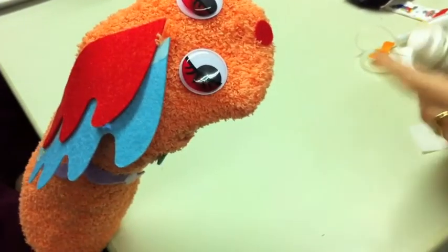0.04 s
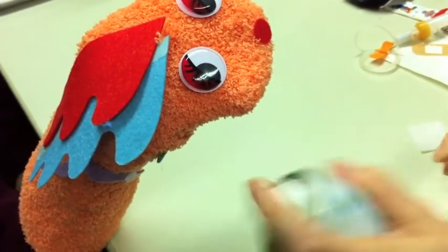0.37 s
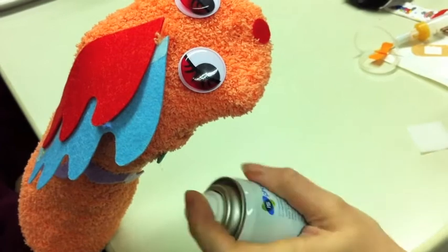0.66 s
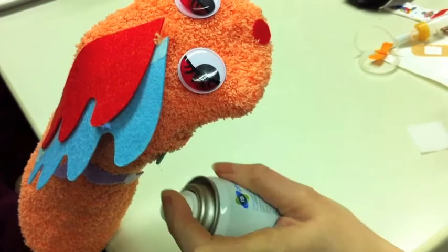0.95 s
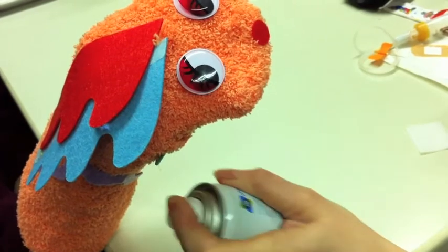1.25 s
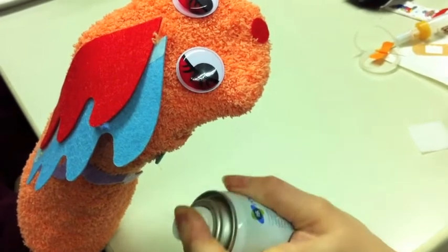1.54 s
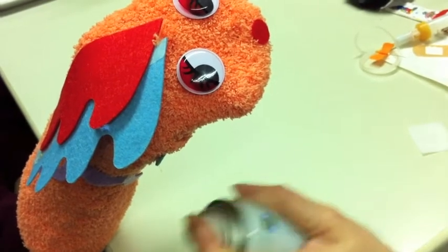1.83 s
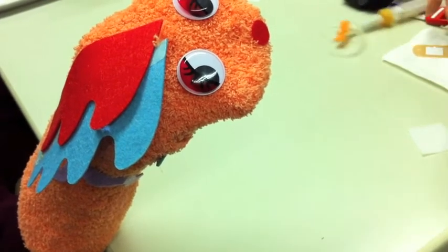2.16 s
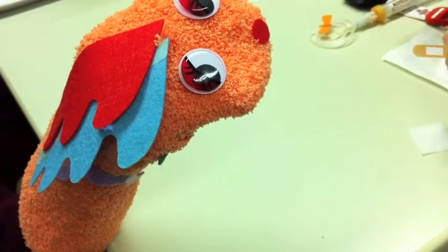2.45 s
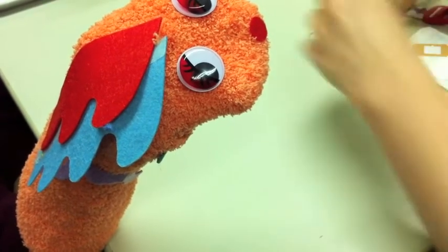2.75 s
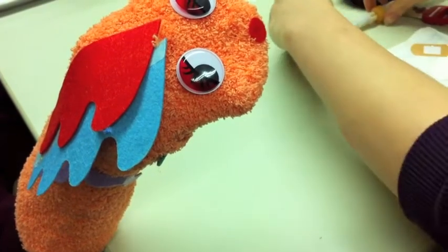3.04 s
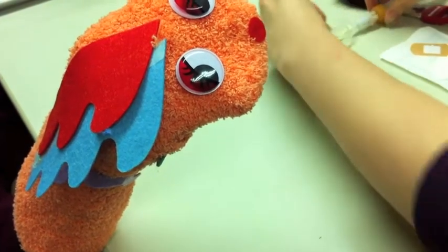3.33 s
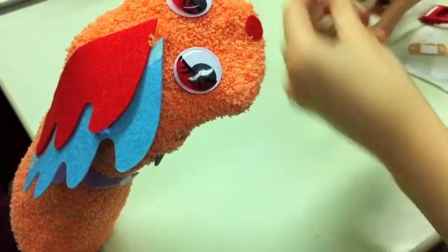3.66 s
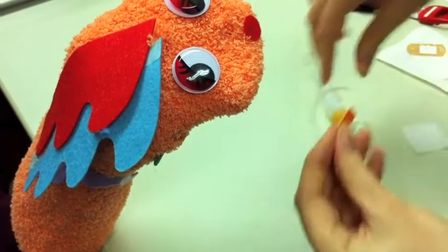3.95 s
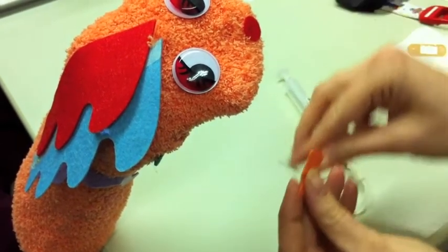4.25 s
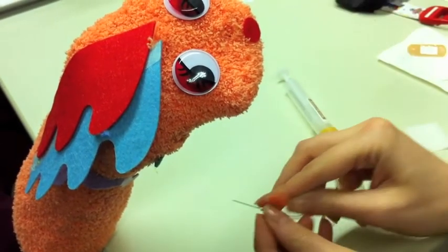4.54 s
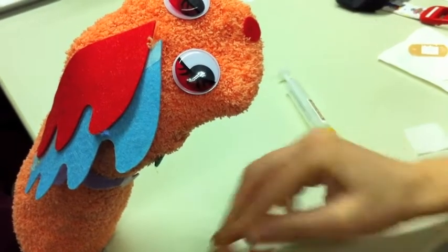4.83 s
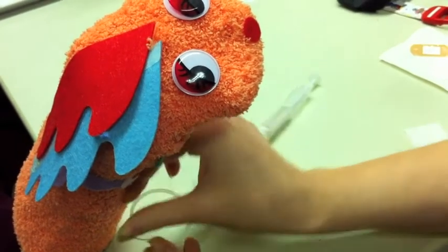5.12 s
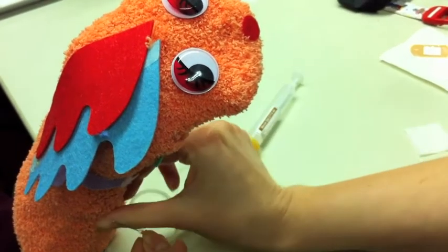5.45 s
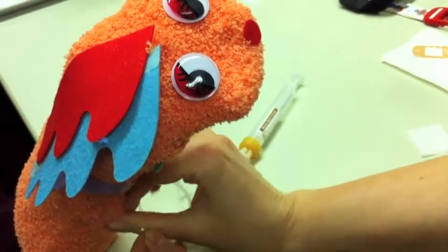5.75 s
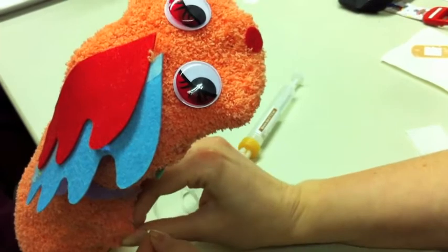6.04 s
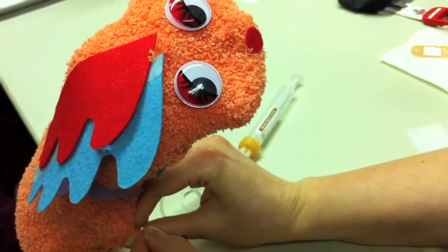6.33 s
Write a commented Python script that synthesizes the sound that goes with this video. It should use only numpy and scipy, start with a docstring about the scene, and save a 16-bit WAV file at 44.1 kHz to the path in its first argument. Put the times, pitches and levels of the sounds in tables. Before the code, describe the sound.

An aerosol can hisses and is set down with a rattling knock, then a plastic syringe drops with two sharp clicks over ventilation hum.

```python
"""Ventilation hums throughout in a small room. At a table, hands rub and tick on plastic as an aerosol
can is picked up. Its nozzle hisses from 1.2 s for a second; the can rattles, lands with a knock and
rocks on its rim. At 3.7 s a plastic syringe is tugged from its clip, chatters and drops on the table
with two sharp clicks. From about 5 s hands brush over the table and a cloth puppet."""
import sys
import numpy as np
from scipy import signal
from scipy.fft import rfft, irfft, next_fast_len
from scipy.io import wavfile
from scipy.ndimage import uniform_filter1d, minimum_filter1d

SR = 44100
rng = np.random.default_rng(int(sys.argv[2]) if len(sys.argv) > 2 else 0)


def wav_out(sig):
    """Save sig, one row per channel (or a flat mono array), as 16-bit PCM at SR to the path in sys.argv[1]."""
    wavfile.write(sys.argv[1], SR, np.round(np.clip(np.atleast_2d(sig).T, -1, 1) * 32767).astype(np.int16))


N = 286024
TIME = np.arange(N) / SR
VALVE_OPEN_S, VALVE_SHUT_S = 1.199, 2.16
CHATTER_S = 0.003   # gap between the two touches of a light contact


def from_db(db):
    """Decibels to gain."""
    return 10 ** (np.asarray(db) / 20)


def rms_one(x):
    """Scale to unit rms."""
    return x / np.sqrt(np.mean(x ** 2) + 1e-20)


def unit_energy(x):
    """Scale to unit energy."""
    return x / np.sqrt(np.sum(x ** 2) + 1e-20)


def at_hz(points, hz):
    """Read a table on a log-frequency axis."""
    f, value = np.transpose(points)
    return np.interp(np.log(np.maximum(hz, 1)), np.log(f), value)


def noise(spectrum, size=N):
    """Coloured noise, rms 1."""
    padded = next_fast_len(size, real=True)
    gain = from_db(at_hz(spectrum, np.arange(padded // 2 + 1) * SR / padded))
    white = rfft(rng.standard_normal(size), padded)
    return rms_one(irfft(white * gain, padded)[:size])


def drift(rate_hz):
    """Random wander, spread about 1."""
    return np.interp(TIME * rate_hz, np.arange(20000), rng.standard_normal(20000))


def fade(t60_s):
    """One second of exponential decay."""
    return from_db(-60 * TIME[:SR] / t60_s)


def ring(hz, t60_s):
    """One struck mode, height 1."""
    return np.sin(2 * np.pi * hz * TIME[:SR]) * fade(t60_s)


def band(x, low_hz, high_hz):
    """Causal band-pass."""
    return signal.sosfilt(signal.butter(2, [low_hz, high_hz], "band", fs=SR, output="sos"), x + 1e-18)


def soften(x, hz):
    """Low-pass: a soft contact loses treble."""
    return signal.lfilter(*signal.butter(1, hz, fs=SR), x)


def radiate(x, low_hz):
    """High-pass: small parts give off little bass."""
    return signal.sosfilt(signal.butter(3, low_hz, "high", fs=SR, output="sos"), x + 1e-18)


def add(out, start_s, sound):
    """Mix a sound in at its time."""
    i = round(start_s * SR)
    out[i:i + len(sound)] += sound[:N - i]


def click(modes, body_db, crack_db, crack_hz, crack_t60_s=0.0073, edge_ratio=1.4, snap_db=-1):
    """One contact: a snap, a splintery crack and the damped ring of the part hit."""
    splinters = unit_energy(rng.standard_normal(SR) * fade(crack_t60_s))
    snap = from_db(snap_db) * (np.arange(SR) == 0)
    crack = unit_energy(band(splinters + snap, crack_hz / edge_ratio, crack_hz * edge_ratio))
    body = sum(from_db(body_db + db) * ring(hz, t60) for hz, db, t60 in modes)
    return body + 2 * from_db(crack_db) * crack


def thin_rings(taps, modes, gain_db):
    """A light hollow body rings on after each tap."""
    out = np.zeros(N)
    for s, tap_db in taps:
        for hz, mode_db, t60 in modes:
            add(out, s, from_db(gain_db + tap_db + mode_db + rng.normal(0, 0.87)) * ring(hz, t60))
    return radiate(out, low_hz=503)


def room(x, build_s=0.00057):
    """Dense reflections: fast build-up, longest decay in the bass."""
    # reflection spectrum: f/Hz, level/dB
    colour = [(60, -41), (200, -1.5), (800, 6.5), (1800, 4.5), (2800, 2.5), (4000, 5), (7000, 1),
              (11000, 4), (16000, 8)]
    # reverberation time: f/Hz, t60/s
    decay = [(150, 0.73), (700, 0.19), (2000, 0.35), (4000, 0.29), (8000, 0.27), (15000, 0.15)]
    edges_hz = np.geomspace(60, 19000, 10)
    tail = np.zeros(SR)
    for low, high in zip(edges_hz, edges_hz[1:]):
        tail += band(noise(colour, SR), low, high) * fade(at_hz(decay, np.sqrt(low * high)))
    onset = 1 - np.exp(-TIME[:SR] / build_s)
    return signal.fftconvolve(x, unit_energy(tail * onset))[:N]


def in_room(x, room_db, low_hz):
    """A small source plus its reflections."""
    return radiate(x + from_db(room_db) * room(x), low_hz)


def moving_room(x, turns_per_s=0.42):
    """The reflection pattern shifts as the source moves."""
    angle = 2 * np.pi * turns_per_s * (TIME - VALVE_OPEN_S)
    return np.cos(angle) * room(x) + np.sin(angle) * room(x)


def ventilation(air_db=-50.5, hum_db=-68, hum_band_hz=(178, 198)):
    """Steady air noise with one soft duct resonance."""
    # air spectrum: f/Hz, level/dB
    air = [(20, 4), (45, -14), (70, -9.5), (120, -3), (170, 0.5), (250, 0), (450, -3), (850, -2),
           (2200, -3), (2700, -6.5), (3300, -13.5), (4500, -16.5), (6500, -19), (15500, -21.5)]
    hum = rms_one(band(rng.standard_normal(N), *hum_band_hz))
    return from_db(air_db) * noise(air) + from_db(hum_db) * hum


def rubbing(strokes, spectrum, catch_db):
    """Friction swells and fades with each stroke and catches unevenly."""
    speed = sum(from_db(db) * np.exp(-2 * ((TIME - s) / length) ** 2) for s, length, db in strokes)
    return speed * from_db(catch_db * drift(130)) * noise(spectrum)


def finger_rubs():
    """Skin rubs; fingers slide on the table top."""
    # friction spectra: f/Hz, level/dB
    skin = [(2000, -22), (3000, 5), (4000, -14), (5500, -4), (7500, -5), (9300, 5), (11500, -2.5),
            (14000, 1.5), (16000, -10)]
    table = [(100, -30), (600, -17), (1200, 2), (1800, 7), (2350, 6), (2900, 0), (3600, -6), (4400, -4),
             (6000, -17), (14000, -27)]
    # strokes: centre t/s, length/s, level/dB
    skin_strokes = [(.19, 0.16, -54), (.3, 0.056, -49.5), (.395, 0.053, -53.5), (.76, 0.14, -61),
                    (2.95, 0.24, -63), (3.42, 0.13, -65), (4.89, .05, -54.5)]
    table_strokes = [(5.3, 0.12, -57), (5.52, 0.38, -53.5)]
    return rubbing(skin_strokes, skin, catch_db=2.5) + rubbing(table_strokes, table, catch_db=1.5)


def fabric_rubs():
    """Cloth and sleeve rustle in strokes."""
    # friction spectra: f/Hz, level/dB
    cloth = [(120, -28), (280, 13.5), (400, 5.5), (560, 7), (1000, 7), (1600, 0.5), (2400, 1), (3300, -4),
             (4500, -15), (7000, -17), (15000, -17)]
    sleeve = [(100, -38), (1200, -3), (2200, 1), (2900, 5.5), (3500, 1), (4200, -8), (5200, -9),
              (8000, -16), (15000, -29)]
    # strokes: centre t/s, length/s, level/dB
    cloth_strokes = [(.3, 0.033, -53.5), (2.95, 0.07, -51), (5.22, 0.081, -49), (5.5, 0.9, -58.5),
                     (5.96, 0.026, -53)]
    sleeve_strokes = [(.18, 0.038, -54), (3.06, 0.12, -57.5), (3.885, 0.061, -35.5), (5.075, 0.085, -48.5)]
    return rubbing(cloth_strokes, cloth, catch_db=3) + rubbing(sleeve_strokes, sleeve, catch_db=5)


def table_bumps():
    """Heavier contacts shake the whole table."""
    # contacts: t/s, level/dB, t60/s
    bumps = [(2.163, -40.5, 0.58), (2.29, -25, 0.26), (3.927, -30, 0.19), (4.02, -50, .15)]
    # table rumble: f/Hz, level/dB
    colour = [(20, 10), (50, -14), (100, -14.5), (200, -2), (350, -2.5), (700, -18), (2000, -50)]
    out = np.zeros(N)
    for s, db, t60 in bumps:
        add(out, s, from_db(db) * noise(colour, SR) * fade(t60))
    return out


def finger_ticks(second_db=-3):
    """Faint double ticks of fingers on plastic."""
    # touches: t/s, body/dB, crack/dB, crack f/Hz
    ticks = [(.296, -46, -40, 8000), (0.6654, -29, -22.5, 4660), (.847, -44, -34, 13000),
             (1.003, -48, -37.5, 12500), (3.464, -42, -29.5, 9350)]
    # button modes: f/Hz, level/dB, t60/s
    button = [(2940, 5.5, 0.0035), (4570, -8.5, .012), (5350, -4, 0.015)]
    out = np.zeros(N)
    for s, body_db, crack_db, crack_hz in ticks:
        add(out, s, click(button, body_db, crack_db, crack_hz))
        add(out, s + CHATTER_S, from_db(second_db) * click(button, body_db, crack_db, crack_hz))
    return in_room(out, room_db=-8, low_hz=1500)


def syringe_tugs(gain_db=-31, rasp_db=-1):
    """Syringe and clip are tugged free: dying dry scrapes excite the plastic clip."""
    # tugs: t/s, level/dB, low-pass f/Hz, t60/s
    tugs = [(3.7105, -7, 4000, 0.085), (3.7873, 0, 15000, 0.14), (3.801, 0.5, 14000, 0.11),
            (3.8435, -17, 7000, 0.035)]
    # clip resonances: f/Hz, width/Hz, level/dB
    clip_modes = [(800, 430, -7.5), (1700, 300, -27), (2880, 310, -4), (3980, 400, -3), (4500, 230, -15),
                  (6240, 300, -14), (8500, 440, -10), (11450, 400, 0), (12900, 660, -1), (13650, 500, -5),
                  (15300, 900, -13)]
    out = np.zeros(N)
    for s, db, bright_hz, t60 in tugs:
        scrape = rng.standard_normal(SR) * fade(t60)
        clip = sum(from_db(level) * unit_energy(band(scrape, hz - width / 2, hz + width / 2))
                   for hz, width, level in clip_modes)
        sound = unit_energy(clip) * np.linalg.norm(scrape) + from_db(rasp_db) * scrape
        add(out, s, from_db(db + gain_db) * soften(sound, bright_hz))
    return in_room(out, room_db=-5, low_hz=298)


def syringe_click(body_db, crack_db, **crack):
    """One damped knock of the plastic syringe."""
    # syringe modes: f/Hz, level/dB, t60/s
    modes = [(1996, -0.5, 0.005), (2800, 1.5, 0.0039), (4200, -11, 0.0022)]
    return click(modes, body_db, crack_db, **crack)


def syringe_lift(second_db=-1):
    """The syringe chatters against its clip; its barrel rings on."""
    taps = [(3.7103, -20), (3.8438, -15.5), (3.874, -27), (3.897, -25)]
    # barrel modes: f/Hz, level/dB, t60/s
    barrel_modes = [(1690, -12, .1), (2830, 1, 0.11), (3680, -2, 0.13), (5350, 4.5, 0.093),
                    (6500, -10, 0.22), (8100, 4, 0.12)]
    out = np.zeros(N)
    for s, db in taps:
        for touch_s, level in ((s, db), (s + CHATTER_S, db + second_db)):
            add(out, touch_s, syringe_click(level - 2, level + 1, crack_hz=5840, edge_ratio=1.6))
    barrel = thin_rings(taps, barrel_modes, gain_db=-24)
    return in_room(out, room_db=-4, low_hz=890) + barrel


def syringe_drop(rebound_s=0.021):
    """Each end hits with a sharp click and a clack of the table top, then rebounds once."""
    # impacts: t/s, body/dB, crack/dB, crack f/Hz, clack/dB
    drops = [(3.9277, 3.5, -3.5, 7400, -6), (4.0166, 0.5, 1.5, 7100, -18.5)]
    # table clack modes: f/Hz, level/dB, t60/s
    clack_modes = [(560, -18, 0.0095), (987, -1, 0.015), (1430, -21, 0.014)]
    plastic, table = np.zeros(N), np.zeros(N)
    for s, body_db, crack_db, crack_hz, clack_db in drops:
        hit = syringe_click(body_db, crack_db, crack_hz=crack_hz,
                            crack_t60_s=0.017, edge_ratio=1.78, snap_db=-10)
        clack = click(clack_modes, clack_db, clack_db - 1,
                      crack_hz=1380, crack_t60_s=0.014, edge_ratio=1.25)
        rebound = syringe_click(body_db - 26.5, crack_db - 9.5, crack_hz=1500)
        add(plastic, s, hit)
        add(table, s, clack)
        add(plastic, s + rebound_s, rebound)
    return in_room(plastic, room_db=-6.5, low_hz=910) + in_room(table, room_db=3.5, low_hz=290)


def can_rattle():
    """The can rattles in the hand on its way down; its thin shell rings on."""
    # taps: t/s, body/dB, crack/dB
    taps = [(2.09, -21, -38), (2.1321, -17.5, -27), (2.1631, -11.5, -14.5), (2.179, -8.5, -25),
            (2.2, -22, -17.5), (2.224, -18, -25), (2.2811, -20, -21)]
    # damped knock and lingering shell modes: f/Hz, level/dB, t60/s
    knock_modes = [(820, -50, 0.038), (1880, -8, 0.0018), (2620, 1.5, 0.0021)]
    shell_modes = [(840, 5.5, 0.1), (1924, 2, 0.17), (9350, -3, 0.034), (9400, 4, 0.039), (10200, 2, 0.032),
                   (12100, -26, 0.089)]
    out = np.zeros(N)
    for s, body_db, crack_db in taps:
        tap = click(knock_modes, body_db, crack_db, crack_hz=6600, crack_t60_s=0.018, edge_ratio=1.7)
        add(out, s, tap)
    shell = thin_rings([(s, crack_db) for s, _, crack_db in taps], shell_modes, gain_db=-17.5)
    return in_room(out, room_db=3, low_hz=380) + shell


def can_set_down(modes_db=-19, thud_db=-12, slap_db=-6, touches=3, gap_ratio=0.84, dulling=0.79):
    """The rim lands and rocks, ever quicker and duller; each touch rings and thuds on the table."""
    # rim landings: t/s, level/dB, low-pass f/Hz, first gap/s, step per touch/dB
    landings = [(2.242, -18.5, 1500, .02, -11), (2.2888, 1.5, 8450, 0.0063, -3),
                (2.4651, -15.5, 1850, .0149, 1.5), (2.5001, -8.5, 3640, .0135, -2.5)]
    # can and table-top modes: f/Hz, level/dB, t60/s
    table_modes = [(190.7, -16.5, 0.26), (320.4, -6.5, 0.23), (495, -9, 0.34), (540, -25, 0.39),
                   (630, -0.5, .22), (787, -21.5, .22), (950, -8.5, 0.3), (1100, -32, 0.19),
                   (1420, -15, 0.33), (1375, -23, 0.19), (1670, -34, .17), (2160, -14, 0.29),
                   (2277, -9.5, 0.2), (2950, -15, 0.15)]
    # table thud spectrum: f/Hz, level/dB
    thud_colour = [(60, -40), (150, -9), (250, -6), (330, -7), (430, -5), (560, -0.5), (800, -4),
                   (1400, 0.5), (2000, -11), (2700, -10), (3600, -24), (5000, -29.5), (7500, -33),
                   (10000, -26.5), (16000, -45)]
    ringing, thuds = np.zeros(N), np.zeros(N)
    modes = sum(from_db(db + modes_db) * ring(hz, t60) for hz, db, t60 in table_modes)
    slap = from_db(slap_db) * ring(hz=620, t60_s=0.01)
    for s, db, bright_hz, gap_s, step_db in landings:
        for k in range(touches):
            gain = from_db(db + k * step_db)
            contact_hz = bright_hz * dulling ** k
            thud = from_db(thud_db) * noise(thud_colour, SR) * fade(t60_s=0.13)
            add(ringing, s, gain * soften(modes, contact_hz))
            add(thuds, s, gain * soften(thud + slap, contact_hz))
            s += gap_s * gap_ratio ** k
    return radiate(ringing, low_hz=140) + in_room(thuds, room_db=-7, low_hz=330)


def jet(eased_s, hump_hz=14000, sag_hz_per_s=1600, width_hz=1700, hump_db=-7, shade_per_s=3.5):
    """Broad hiss with a sinking hump on top; its middle is shaded as the can turns."""
    # jet spectrum: f/Hz, level/dB
    colour = [(1500, -60), (3200, -4), (4200, -7), (5500, -5.5), (6100, -2), (7400, -5), (8400, -1),
              (9500, -1), (10200, 1.5), (11400, -0.5), (12500, 2.5), (14300, -2), (15100, -11),
              (16000, -30)]
    centre_hz = hump_hz - sag_hz_per_s * np.clip(TIME - VALVE_OPEN_S, 0, 1)
    phase = 2 * np.pi * np.cumsum(centre_hz) / SR
    spread = signal.lfilter(*signal.butter(2, width_hz / 2, fs=SR), rng.standard_normal((2, N)))
    hump = rms_one(spread[0] * np.cos(phase) + spread[1] * np.sin(phase))
    hiss = rms_one(noise(colour) + from_db(hump_db) * hump)
    shade = np.clip(shade_per_s * eased_s, 0, 1)
    return hiss - shade * band(hiss, low_hz=3800, high_hz=8600)


def spray(hiss_db=-30.15, rush_db=-32, leak_db=-20, flutter_db=0.9, sputter_db=3.5):
    """The nozzle leaks, then opens: a bright jet, grainy with droplets, over a hollow rush."""
    # rush spectrum: f/Hz, level/dB
    rush_colour = [(150, -46), (400, -17.5), (640, -23), (800, -13.5), (1100, -9.5), (1500, -14),
                   (1750, -1), (2000, -6.5), (2350, 0), (2750, -0.5), (3050, -14), (4000, -11.5),
                   (8000, -33)]
    hiss_sag_db_per_s, rush_sag_db_per_s = 55, 96
    eased_s = np.maximum(TIME - 1.955, 0)   # button eased off, nozzle turning away
    open_s = TIME - VALVE_OPEN_S
    hiss = from_db(hiss_db - hiss_sag_db_per_s * eased_s) * jet(eased_s)
    build = np.interp(open_s, [0, 0.036], [0.55, 1])
    rush = from_db(rush_db - rush_sag_db_per_s * eased_s) * build * noise(rush_colour)
    leak = from_db(leak_db) * np.interp(open_s, [-0.12, 0], [0, 1])
    valve = np.interp(open_s, [0, 0.0035], [0, 1])
    release = np.interp(TIME, [VALVE_SHUT_S - 0.04, VALVE_SHUT_S], [1, 0])
    grain = from_db(-flutter_db * drift(52) + sputter_db * drift(1100))
    flow = np.maximum(leak, valve) * release * grain
    return radiate(flow * (hiss + rush), low_hz=90)


def scene(spray_room_db=-5):
    """Mono mix above the table; reflections ripple the colour of the jet."""
    hiss = spray()
    can = finger_ticks() + hiss + from_db(spray_room_db) * moving_room(hiss)
    can += can_rattle() + can_set_down()
    syringe = syringe_tugs() + syringe_lift() + syringe_drop()
    hands = finger_rubs() + fabric_rubs()
    return (can + syringe + hands + table_bumps() + ventilation())[None]


def record(dry, low_cut_hz=100, high_cut_hz=16000, window_samples=13):
    """Fast peak limiter at full scale, then bass and top cut."""
    allowed = 1 / np.maximum(np.abs(dry), 1)
    gain = uniform_filter1d(minimum_filter1d(allowed, window_samples), window_samples)
    thinned = signal.sosfilt(signal.butter(2, low_cut_hz, "high", fs=SR, output="sos"), gain * dry)
    return signal.sosfilt(signal.ellip(10, 0.2, 75, high_cut_hz, fs=SR, output="sos"), thinned)


dry = scene()
out = record(dry)
wav_out(out)
```